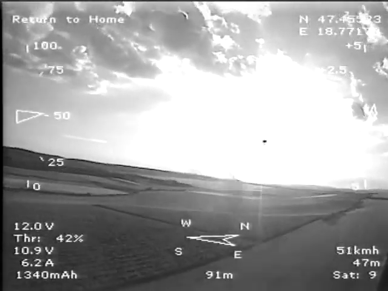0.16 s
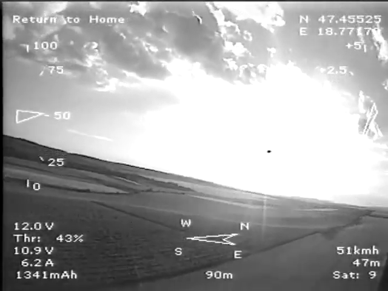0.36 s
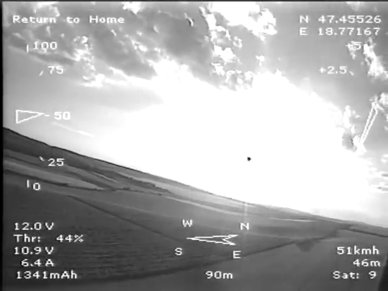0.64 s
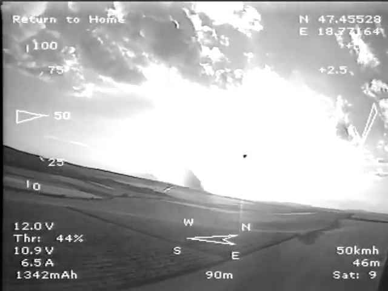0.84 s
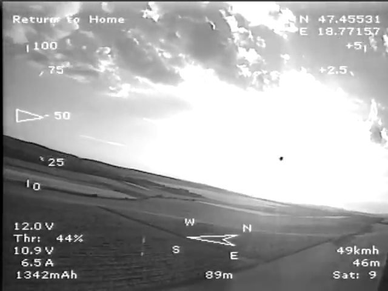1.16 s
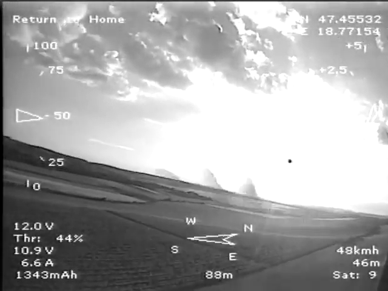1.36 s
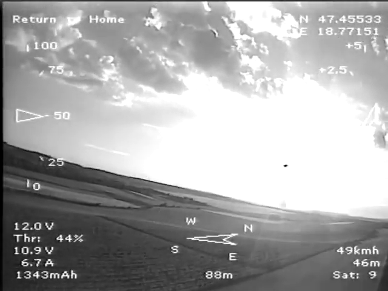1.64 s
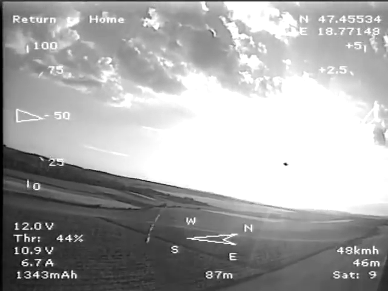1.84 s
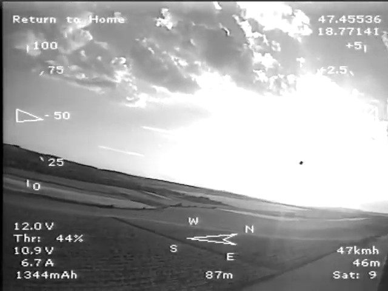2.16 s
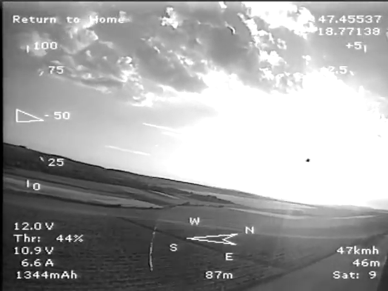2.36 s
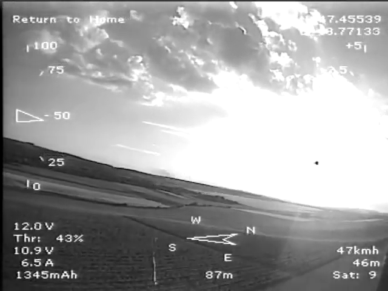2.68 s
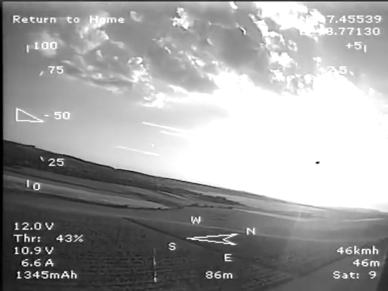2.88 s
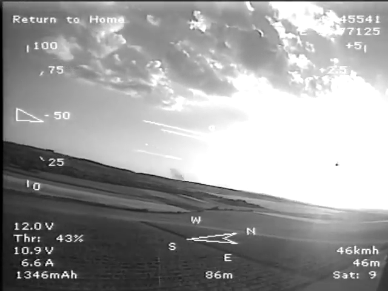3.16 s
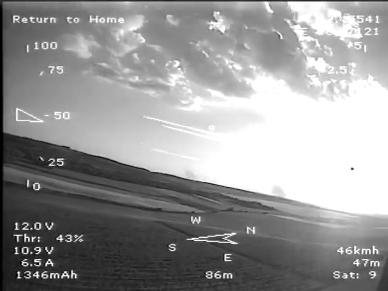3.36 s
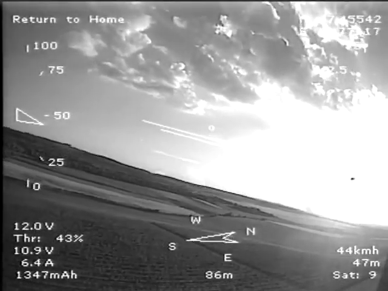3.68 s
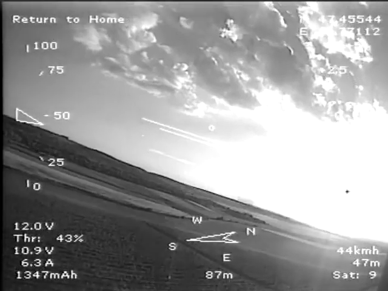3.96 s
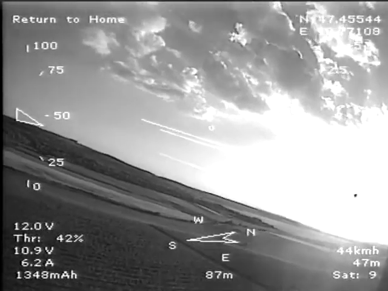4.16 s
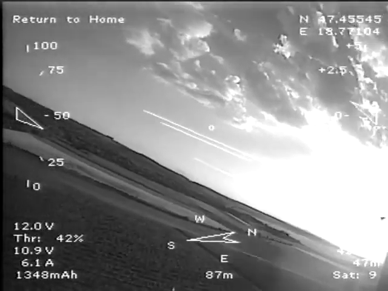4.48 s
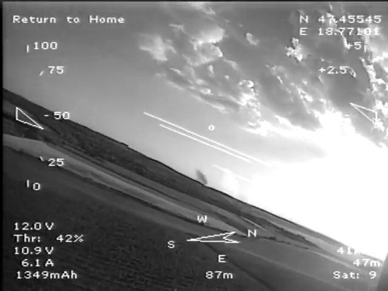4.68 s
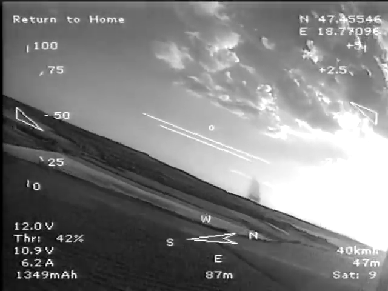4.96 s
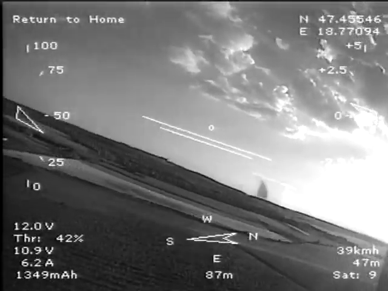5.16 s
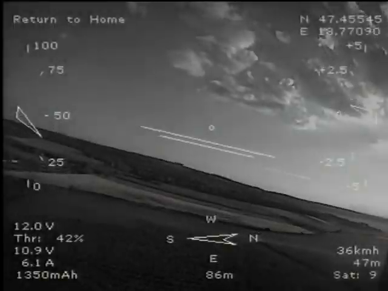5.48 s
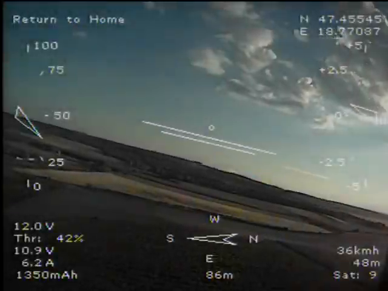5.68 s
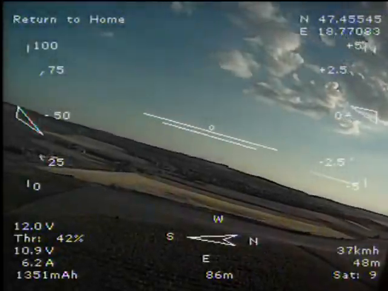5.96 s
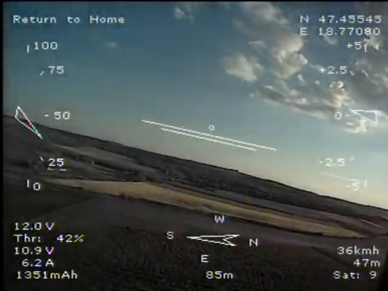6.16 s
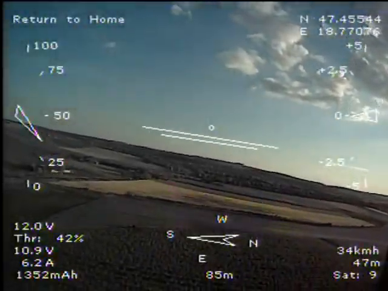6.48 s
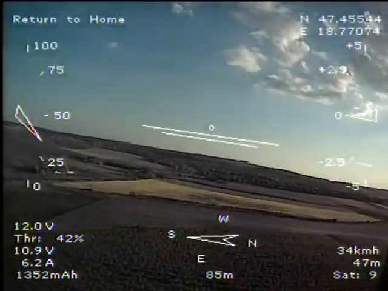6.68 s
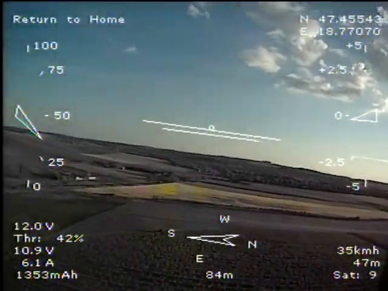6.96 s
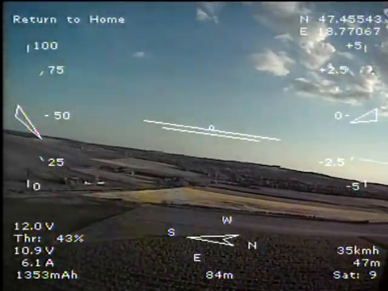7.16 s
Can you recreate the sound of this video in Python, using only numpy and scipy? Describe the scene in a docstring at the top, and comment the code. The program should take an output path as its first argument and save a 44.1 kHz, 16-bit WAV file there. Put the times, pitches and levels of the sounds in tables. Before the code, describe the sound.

Harsh buzzing static crackles under a piercing high whine from a model plane's video link, then drops to faint hiss and a softer whine.

```python
"""A model plane in flight, heard on the ground at the sound output of its analogue video receiver; no
microphone, no air between. From the start the picture leaks in: crackle where sun glare overdrives the
link, a whine at the line rate, shaped by the view as each field is scanned, and ticks at the field sync.
The plane banks into a steep turn and lone cracks break through. At 5.3 s the camera closes its exposure:
the crackle stops, whine and ticks fall back, and hiss and the motor controller's tones remain."""
import sys
import numpy as np
from scipy import signal
from scipy.fft import rfft, irfft
from scipy.io import wavfile

SR = 44100
rng = np.random.default_rng(int(sys.argv[2]) if len(sys.argv) > 2 else 0)


def put_to_file(sound):
    """Save the sound as 16-bit audio at rate SR, in the file named by the first command-line argument."""
    columns = np.atleast_2d(sound).T  # one column per channel
    safe = np.clip(columns, -1, 1)
    whole_steps = np.round(safe * 32767)
    wavfile.write(sys.argv[1], SR, whole_steps.astype(np.int16))


N = 322812
TIME = np.arange(N) / SR
EXPOSURE_S = 5.3365
GLARE = TIME < EXPOSURE_S
FIELD_HZ, LINE_HZ = 49.9988, 15624.6
FIELD_MS, TOP_MS, SYNC_MS = 20, 6, 24.4
FIELD_CYCLES = TIME * FIELD_HZ - TOP_MS / FIELD_MS + 1
FIELD = FIELD_CYCLES.astype(int)
SCAN_MS = TOP_MS + FIELD_MS * (FIELD_CYCLES - FIELD)   # place of the scan, from the picture's top down

# the plane's turn: time_s, horizon_ms, lower_glare_band_ms, view (0 level, 1 turning, 2 banked, 3 steep)
TURN_PATH = [(0, 15.2, 22.6, .7), (.46, 15.9, 22.7, .25), (.86, 15.9, 23.4, 0), (1.4, 16.2, 22.9, 0),
             (1.8, 16.4, 23.3, .4), (2.6, 16.5, 22.6, .8), (3.26, 17.0, 22.4, 1), (3.5, 17.5, 22.0, 1.05),
             (4.1, 18.5, 22.3, 1.3), (4.46, 19.5, 21.0, 2), (4.86, 19.5, 21.5, 2.7), (5.06, 19.3, 21.1, 3)]


def amp(db):
    """Decibels to gain."""
    return 10 ** (np.asarray(db) / 20)


def rms_one(x):
    """Scale to rms 1."""
    return x / np.sqrt(np.mean(x ** 2))


def butter_filter(x, order, hz, kind="low"):
    """Pass a signal through a Butterworth filter."""
    return signal.lfilter(*signal.butter(order, hz, kind, fs=SR), x)


def in_time(rows):
    """The columns of a timed table at every sample."""
    time_s, *columns = np.transpose(rows)
    return [np.interp(TIME, time_s, column) for column in columns]


def bump(at_ms, width_ms):
    """A bell of height 1 round one place in the field."""
    return np.exp(-.5 * ((SCAN_MS - at_ms) / width_ms) ** 2)


def step(at_ms, width_ms):
    """A soft rise from 0 to 1 at one place in the field."""
    return .5 + .5 * np.tanh((SCAN_MS - at_ms) / width_ms)


def per_field(spread):
    """One chance value held through each field."""
    return spread * rng.standard_normal(FIELD[-1] + 1)[FIELD]


def glare_edges():
    """Scan places of the horizon and the lower glare band, in ms; both stand still in the dim picture."""
    horizon, band, _ = in_time(TURN_PATH)
    return np.where(GLARE, horizon, 15.2), np.where(GLARE, band, 22.6)


def by_view(rows):
    """Blend each row from view to view along the turn; the last, dim, holds once the exposure closes."""
    view = np.where(GLARE, in_time(TURN_PATH)[-1], len(rows[0]) - 1)
    return np.array([np.interp(view, np.arange(len(row)), row) for row in rows])


def link_colour(x):
    """De-emphasis dulls the top; the coupling thins the low middle but leaves some deep bass."""
    dull = butter_filter(x, 1, 3490)
    thin = butter_filter(dull, 2, 860, "high")
    thin = butter_filter(thin, 1, 450, "high")
    bass = butter_filter(dull, 1, 250)
    return amp(8) * (thin + amp(-17.5) * bass)


def glare_crackle(jitter_ms, burst_spread_db, grit_db):
    """Glare overdrives the link: clicks, densest where the scan crosses its edges, hushed during sync."""
    # relative crackle levels over the picture: time_s, sky_db, glare_edge_db, ground_db
    crackle_levels = [(0, -24, -9.5, -22.5), (.16, -22.5, -7.5, -22), (.3, -16.5, -2, -14.5),
                      (.5, -20.5, -5, -15), (.8, -25.5, -10.5, -21), (1.0, -24.8, -9.5, -19),
                      (1.2, -22.5, -6, -17), (1.46, -17, -6, -10.5), (1.53, -20, -7.5, -13.5),
                      (1.59, -26, -10.5, -21), (1.74, -28.5, -17.5, -24), (1.94, -25, -11, -19),
                      (2.4, -26, -11, -21), (2.9, -25.5, -11, -24), (3.36, -26.4, -11.5, -24.5),
                      (3.46, -24.5, -7, -20.5), (3.56, -25, -11, -20), (4.0, -24, -6.5, -20),
                      (4.2, -26, -8.5, -17), (4.38, -25.5, -11.5, -10), (4.56, -26, -19, -17),
                      (4.66, -20, -12.5, -17), (4.96, -18.5, -19.5, -16.5), (5.2, -16, -20.5, -15),
                      (5.335, -15, -16, -16)]
    sky_db, edge_db, ground_db = in_time(crackle_levels)
    horizon, band = glare_edges()
    low_sky_db = -27 + .67 * (sky_db + 27)   # the low sky swings less than the high sky
    click_db = sky_db + (low_sky_db - sky_db) * step(12.6, .73) + per_field(1.0)
    click_db += (ground_db - click_db) * step(horizon, 1.0)
    click_db += (sky_db - .5 - click_db) * step(band + 1.6, .6)
    in_sync = step(SYNC_MS + .2, .2) + 1 - step(6.7, .15)
    click_db -= 4 * in_sync
    upper_burst = amp(edge_db + per_field(burst_spread_db)) * bump(horizon + per_field(jitter_ms), .57)
    lower_at_ms = band + .14 + per_field(jitter_ms)
    lower_width_ms = np.where(SCAN_MS < lower_at_ms, .7, .4)   # builds slowly, stops short
    lower_burst = amp(edge_db + .93 + per_field(burst_spread_db)) * bump(lower_at_ms, lower_width_ms)
    uneven_noise = rng.standard_normal(N) * amp(grit_db * rng.standard_normal(N))
    clicks = amp(click_db) * rms_one(uneven_noise)
    bursts = (upper_burst + lower_burst) * rng.standard_normal(N)
    # alternate lines differ, so the bursts carry a tone at half the line rate
    half_line = amp(-15) * (upper_burst - lower_burst) * np.sin(np.pi * LINE_HZ * TIME)
    return (link_colour(clicks + bursts) + half_line) * GLARE


def line_whine(flicker, edge_flicker, align_ms):
    """The line tone: its strength follows the contrast across a line, its phase the bright part's place."""
    # whine strength, a row for each of places_ms: level_view_db, turning_db, banked_db, steep_db, dim_db
    contrast = [(-18.4, -18.5, -20.5, -22.5, -31), (-14.2, -15.3, -13.6, -15.8, -30.2),
                (-13.5, -13.7, -16.2, -18, -27.6), (-10.3, -14.5, -22, -35, -26),
                (-15.2, -20.5, -19, -32, -30.5), (-15.5, -21.5, -17.5, -23, -36.4),
                (-11.8, -11.2, -16, -22, -37.6), (-19.5, -29, -30, -35, -40.8)]
    # sideways shift of a line's bright part, same rows and views: shift_lines
    bright_shift = [(0, 0, 0, 0, 0), (-.02, -.03, -.11, -.19, -.01), (.02, -.01, -.18, -.29, -.03),
                    (.1, .1, .1, -.29, -.08), (-.11, -.13, .13, .04, -.15), (.02, .02, .13, .04, -.02),
                    (.2, .22, .15, .02, .03), (.19, .06, -.08, -.04, .05)]
    # whine during sync, same views: level_db
    sync_levels = [(-30, -31, -32, -33, -42)]
    horizon, band = glare_edges()
    horizon = horizon - .2
    sky_ms, ground_ms = horizon - TOP_MS, band - horizon
    # top, mid sky, low sky, horizon, upper ground, lower ground, lower band, foot
    places_ms = [7.5, TOP_MS + .6 * sky_ms, TOP_MS + .88 * sky_ms, horizon,
                 horizon + .25 * ground_ms, horizon + .7 * ground_ms, band, 24.1]
    phasors = amp(by_view(contrast)) * np.exp(2j * np.pi * by_view(bright_shift))
    envelope = phasors[0].copy()
    for k in range(len(places_ms) - 1):
        progress = np.clip((SCAN_MS - places_ms[k]) / (places_ms[k + 1] - places_ms[k]), 0, 1)
        envelope += (phasors[k + 1] - phasors[k]) * progress
    at_edges = (bump(horizon, .35) + bump(band + .3, .45)) * GLARE
    envelope *= 1 + .35 * at_edges
    sync_phasor = -amp(by_view(sync_levels)[0])   # opposite phase
    envelope += (sync_phasor - envelope) * step(SYNC_MS + .4, .2)
    grain = butter_filter(rng.standard_normal(N) + 1j * rng.standard_normal(N), 2, 500)
    envelope *= 1 + (flicker + edge_flicker * at_edges) * grain
    # cancel the top cut's delay to keep the whine in step with the crackle
    envelope = np.roll(envelope, -round(align_ms * SR / 1000))
    return np.real(envelope * np.exp(2j * np.pi * LINE_HZ * TIME))


def lone_cracks(decay_ms, thump_db):
    """Short bursts of overdriven noise, each with a dull thump."""
    # hard cracks in the link: start_s, relative_level_db
    cracks = [(1.461, 5), (1.956, 2), (3.495, 2.5), (3.956, 2.5), (4.298, 2.5), (4.418, 2), (4.99, -7),
              (5.189, -8), (5.228, 1), (5.267, 5), (5.284, -5), (5.307, -10)]
    impulses = np.zeros(N)
    for start_s, level_db in cracks:
        impulses[round(start_s * SR)] = amp(level_db - 5)
    envelope = signal.lfilter([1], [1, -np.exp(-1000 / (decay_ms * SR))], impulses)
    burst = butter_filter(envelope * rng.standard_normal(N), 1, [700, 2800], "band")
    thump = butter_filter(envelope, 1, [40, 400], "band")
    return 2 * burst + amp(thump_db) * thump


def field_ticks():
    """Text rows, sync edges and swings of picture brightness tick once in every field."""
    # text rows and sync edges: place_ms, width_ms, glare_height, dim_height
    marks = [(6.25, .15, .06, .007), (7.2, .1, .09, .005), (7.55, .1, -.09, -.004), (21.0, .08, .05, .002),
             (21.4, .08, -.06, -.002), (22.95, .06, -.13, -.004), (23.3, .07, .12, .007),
             (24.33, .05, -.08, .003), (24.48, .05, .13, .022), (24.63, .05, -.03, -.028),
             (25.92, .05, -.1, -.023)]
    # brightness swing at the horizon, lower band and ground strips: height in each of the five views
    swings = [(0.069, 0.082, .002, 0.0011, 0.0012), (.085, 0.074, 0.0037, .001, 0.0016),
              (0.018, 0.036, .005, .001, 0.0018)]
    ticks = sum(np.where(GLARE, bright, dim) * bump(ms, width_ms) for ms, width_ms, bright, dim in marks)
    ticks -= butter_filter(ticks, 1, 300) * GLARE   # thinner in the glare
    horizon, band = glare_edges()
    horizon_swing, band_swing, strip_swing = by_view(swings)
    # as the horizon sinks it slants and its swing blurs away
    sharpness = np.clip((18.3 - horizon) / 1.3, 0, 1)
    ticks += horizon_swing * sharpness * (bump(horizon - .3, .22) - bump(horizon + .45, .22))
    ticks += band_swing * (bump(band + .045, .13) - bump(band + 1.0, .18))
    ground_strips = np.cos(2 * np.pi * 1.1 * (SCAN_MS - 19.0))   # 1.1 strips per ms of scan
    ticks += strip_swing * bump(band - 2.0, 1.5) * ground_strips
    return butter_filter(ticks, 2, 210, "high")


def motor_controller():
    """Steady switching tones, with hiss round 7.7 kHz and a separate narrow hiss at 15.8 kHz."""
    # side tones round the 7.7 kHz switching rate, and two tones near its octave: pitch_hz, level_db
    tones = [(7421.4, -68), (7445.7, -66), (7597.8, -62), (7656.4, -53), (7715.1, -53), (7773.8, -62),
             (7925.9, -65), (7949.9, -65), (15274.7, -58), (15371.6, -44.5)]
    # narrow bands of hiss: centre_hz, width_hz, level_db
    hiss_bands = [(7740, 370, -49.5), (15800, 260, -45)]
    sound = sum(np.sqrt(2) * amp(db) * np.sin(2 * np.pi * (hz * TIME + rng.random())) for hz, db in tones)
    for centre_hz, width_hz, level_db in hiss_bands:
        resonance = signal.iirpeak(centre_hz, centre_hz / width_hz, fs=SR)
        sound += amp(level_db) * rms_one(signal.lfilter(*resonance, rng.standard_normal(N)))
    return sound


def receiver_hiss(base_db, sky_db, horizon_db, ground_db):
    """Receiver noise, stronger where the picture is bright."""
    # colour of the hiss: frequency_hz, relative_density_db
    spectrum = [(20, -18.5), (70, -26), (300, -21), (2000, -22.5), (6000, -24), (12000, -23), (17000, -26)]
    corner_hz, density_db = np.transpose(spectrum)
    hz = np.maximum(np.arange(N // 2 + 1) * SR / N, 1)
    colour = amp(np.interp(np.log(hz), np.log(corner_hz), density_db))
    noise = rms_one(irfft(rfft(rng.standard_normal(N)) * colour, N))
    horizon, _ = glare_edges()
    rise = np.clip((SCAN_MS - TOP_MS) / (horizon - TOP_MS), 0, 1) ** 3
    lift_db = sky_db + (horizon_db - sky_db) * rise
    lift_db += (ground_db - lift_db) * step(horizon + 1.6, 1.2)
    return amp(base_db + lift_db) * noise


def scene():
    """Everything at the receiver's output, in mono."""
    mix = glare_crackle(jitter_ms=.22, burst_spread_db=1.65, grit_db=4.5)
    mix += line_whine(flicker=.62, edge_flicker=.8, align_ms=.36)
    mix += lone_cracks(decay_ms=2.1, thump_db=-23)
    mix += field_ticks()
    mix += motor_controller()
    mix += receiver_hiss(base_db=-45, sky_db=-.5, horizon_db=3, ground_db=-3.5)
    return mix[None]


def record(dry):
    """The loudest peaks are rounded and the top is cut steeply above 17 kHz."""
    rounded = 1.315 * np.tanh(dry / 1.278)
    top_cut = signal.ellip(12, .5, 60, 17090, fs=SR, output="sos")
    return signal.sosfilt(top_cut, rounded)


dry = scene()
out = record(dry)
put_to_file(out)
```